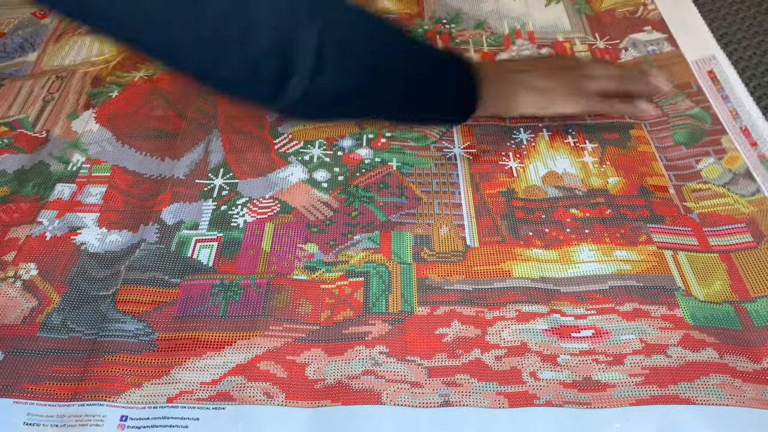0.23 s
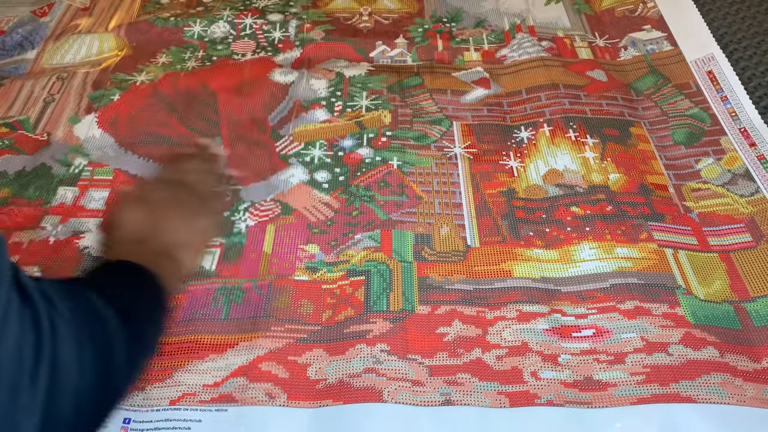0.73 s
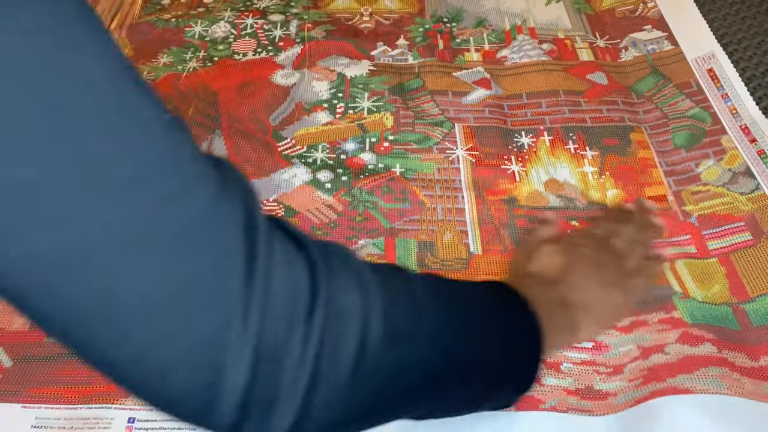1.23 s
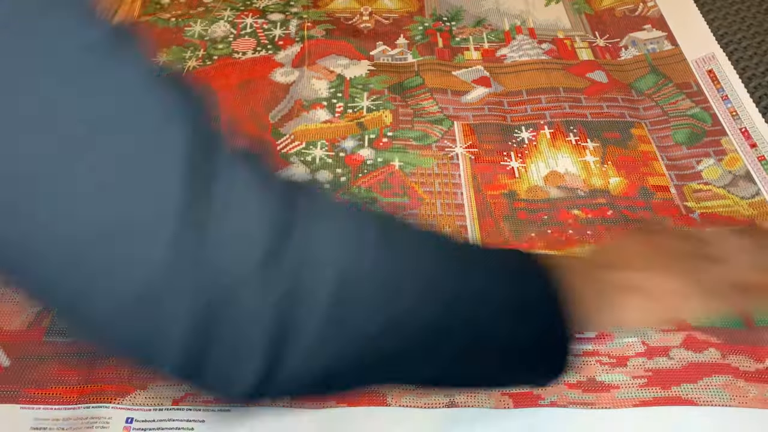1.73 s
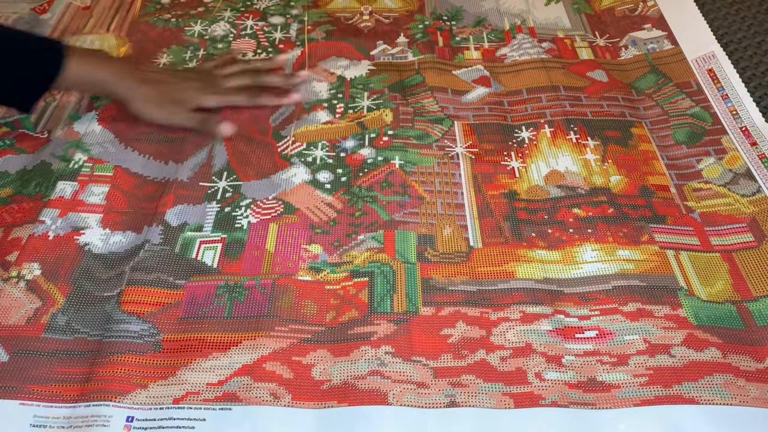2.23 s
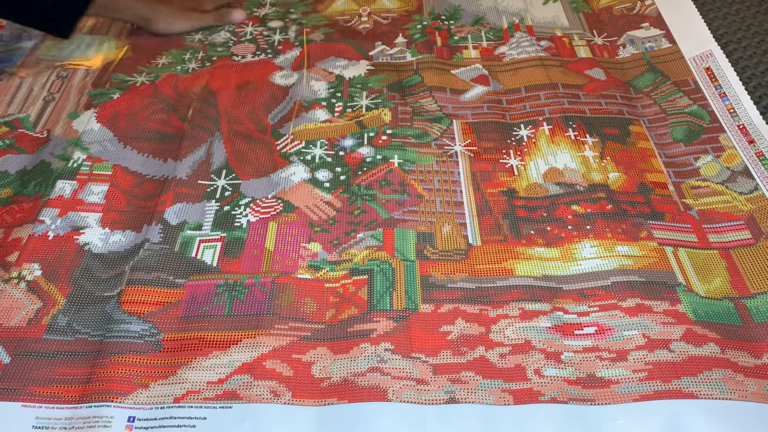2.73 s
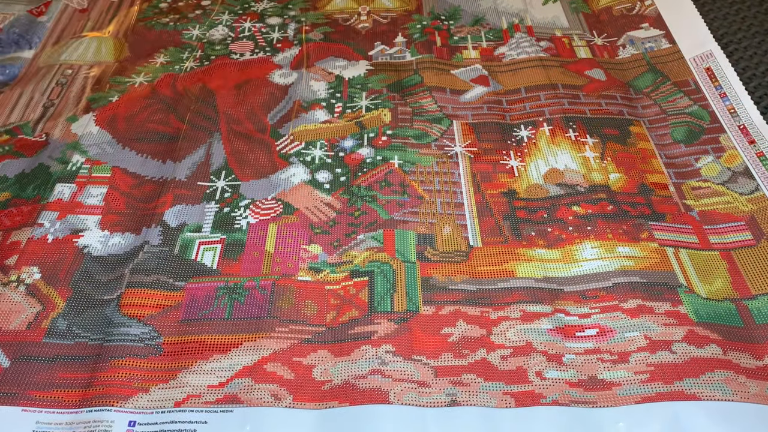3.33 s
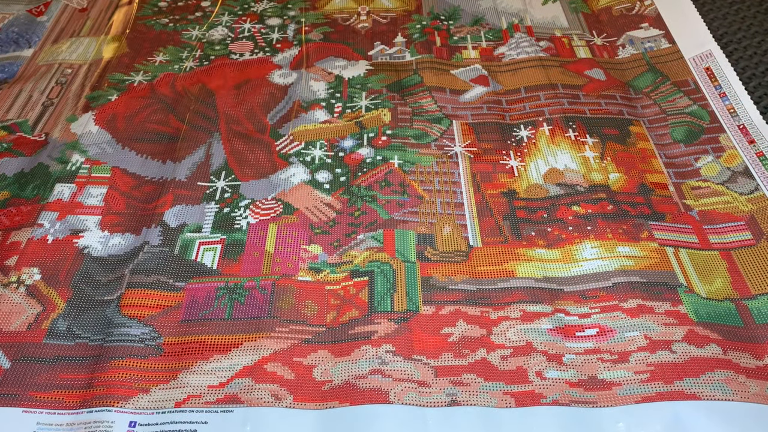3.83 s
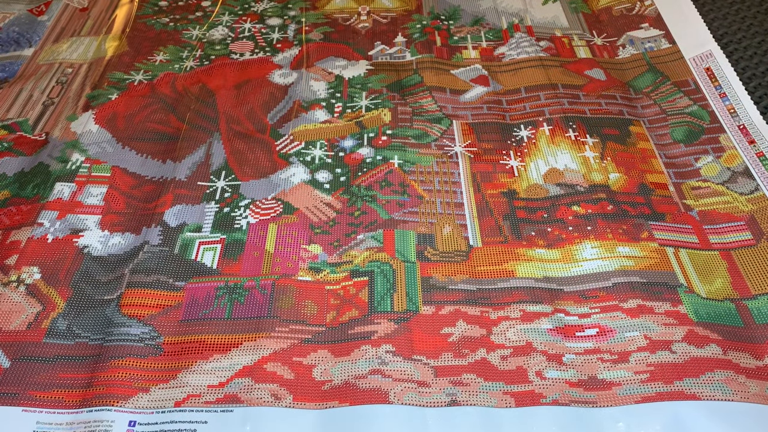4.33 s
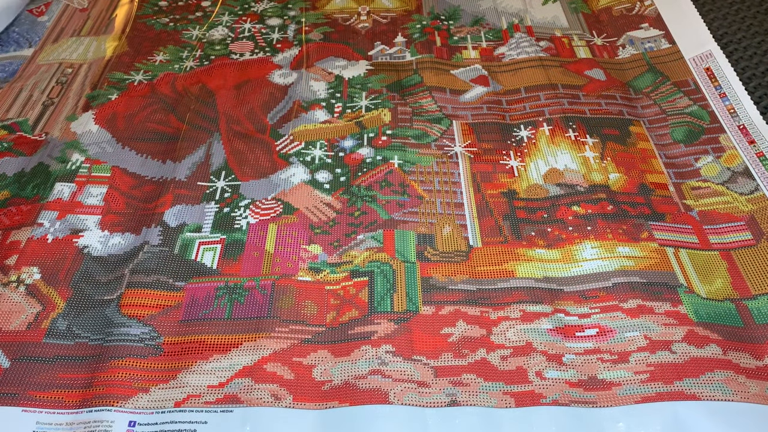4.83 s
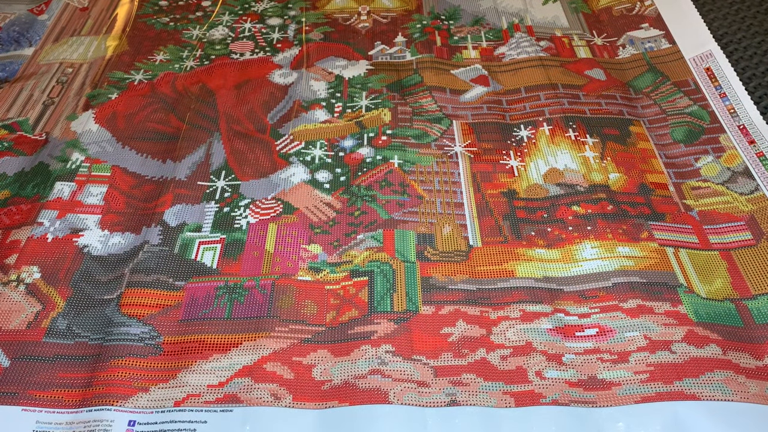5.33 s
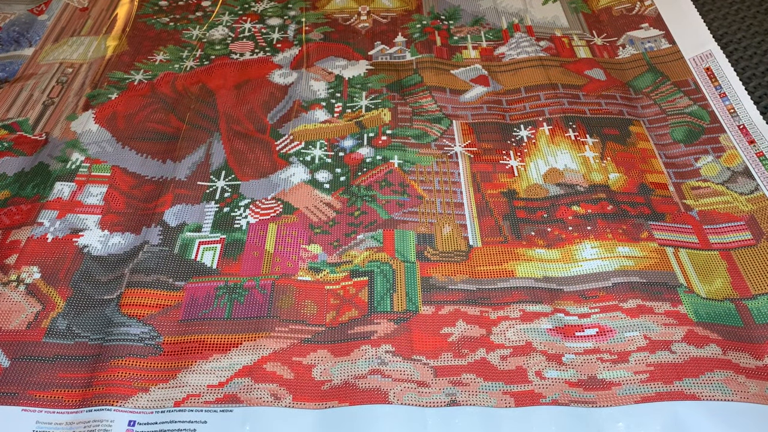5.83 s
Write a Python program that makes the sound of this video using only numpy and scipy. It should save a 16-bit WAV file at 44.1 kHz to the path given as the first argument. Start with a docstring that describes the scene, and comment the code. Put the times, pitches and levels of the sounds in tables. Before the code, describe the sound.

A palm slides over a large plastic-covered canvas on a table, making bright, grainy swishes and sharp little crinkles. The strokes come in two spells with a brief lull between them, and a few soft finger taps knock the table. The rubbing then dies down to faint rustles, scattered ticks and light taps. It is heard close by in stereo, in a quiet room with a low rumble and motor hum.

```python
"""Smoothing film over a canvas

A hand smooths a large canvas under plastic film on a table in a quiet room. Palm, film and canvas
hiss with tiny slips as they slide; the film buckles in sharp snaps, and finger taps ring the table top.
Air rumbles and a motor hums at twice the mains rate. Two microphone ports 10 cm apart pick it up."""
import sys
import numpy as np
from scipy import signal
from scipy.fft import rfft, irfft, next_fast_len
from scipy.io import wavfile

SR = 44100
rng = np.random.default_rng(int(sys.argv[2]) if len(sys.argv) > 2 else 0)


def put_to_file(sound):
    """Save the sound as 16-bit audio at rate SR, in the file named by the first command-line argument."""
    columns = np.atleast_2d(sound).T  # one column per channel
    safe = np.clip(columns, -1, 1)
    whole_steps = np.round(safe * 32767)
    wavfile.write(sys.argv[1], SR, whole_steps.astype(np.int16))


N = 268613
TIME_S = np.arange(N) / SR
FFT_SIZE = next_fast_len(N)
BINS_HZ = np.arange(FFT_SIZE // 2 + 1) * SR / FFT_SIZE + 1
PORT_LAG_S = 0.0003   # the sheet lies nearer the left port


def from_db(db):
    return 10 ** (np.asarray(db) / 20)


def unit_rms(x):
    return x / np.sqrt(np.mean(x ** 2) + 1e-20)


def on_bins(points, column=1):
    points = np.array(points)
    return np.interp(np.log(BINS_HZ), np.log(points[:, 0]), points[:, column])


def filtered(x, response):
    return irfft(rfft(x, FFT_SIZE) * response, FFT_SIZE)[..., :N]


def colour(x, spectrum):
    """Spectral shaping at unit power gain for white noise."""
    return filtered(x, unit_rms(from_db(on_bins(spectrum))))


def delayed(x, lag_s):
    return filtered(x, np.exp(-2j * np.pi * BINS_HZ * lag_s))


def drift(corner_hz):
    """Slow noise at unit rms: two-pole low-pass, run at SR / 20."""
    pole = np.exp(-40 * np.pi * corner_hz / SR)
    slow = signal.lfilter([1], [1, -2 * pole, pole * pole], rng.standard_normal(N // 20 + 4002))[4000:]
    return np.interp(np.arange(N) / 20, np.arange(len(slow)), unit_rms(slow))


def impulses(times_s, sizes):
    train = np.full(N, 1e-18)
    np.add.at(train, (np.asarray(times_s) * SR).astype(int), sizes)
    return train


def ring(x, hz, t60_s):
    """Damped mode: a unit impulse starts a unit sine."""
    r, w = from_db(-60 / (t60_s * SR)), 2 * np.pi * hz / SR
    return signal.lfilter([0, np.sin(w)], [1, -2 * r * np.cos(w), r * r], x)


def swells(times_s, levels_db, rise_s, fall_s):
    """Power envelope of events that rise 60 dB in rise_s and fall 60 dB in fall_s."""
    rise, fall = from_db(-120 / (np.array([rise_s, fall_s]) * SR))
    train = impulses(times_s, from_db(2 * levels_db))
    before = signal.lfilter([0, rise], [1, -rise], train[::-1])[::-1]
    return before + signal.lfilter([1], [1, -fall], train)


def friction(level_db, spectrum, slips_per_s, spread_db, grain_db, alike,
             patchy_db=2.2, boost_db=lambda hz: 0, bands=10):
    """Sliding hiss and clumped slips in drifting bands; the wide contact is partly alike at the ports."""
    slipping = rng.random(N) < slips_per_s * from_db(5 * drift(15)) / SR
    sizes = from_db(spread_db * np.minimum(rng.exponential(1, N), 3))
    slips = unit_rms(slipping * sizes * rng.choice([-1, 1], N))
    slip_band = rng.uniform(0, bands - 1, N)
    common = np.sqrt(alike) * rng.standard_normal(N)
    separate = np.sqrt(1 - alike) * rng.standard_normal((2, N))
    log_centres = np.linspace(np.log(spectrum[0][0]), np.log(spectrum[-1][0]), bands)
    port_delays = np.exp(-2j * np.pi * BINS_HZ * [[0], [PORT_LAG_S]])
    shape = unit_rms(from_db(on_bins(spectrum))) / np.sqrt(1 + from_db(2 * grain_db))
    out = 0
    for k, triangle in enumerate(np.eye(bands)):
        band = shape * np.interp(np.log(BINS_HZ), log_centres, triangle)
        grain = from_db(grain_db) * np.sqrt(2) * (abs(slip_band - k) < bands / 3) * slips
        rubbing = filtered(separate, band) + filtered(common + grain, band * port_delays)
        out += from_db(patchy_db * drift(13.5) + boost_db(np.exp(log_centres[k]))) * rubbing
    return from_db(level_db) * out


# Steady stroke: t/s, film level/dB, palm level/dB
HAND_STROKE = [(0.0, -34, -49.5), (0.15, -44.5, -50), (0.3, -55, -64), (0.52, -69, -69), (0.6, -65, -52.5),
               (0.9, -39, -48.5), (1.42, -41, -49), (1.52, -42, -50.5), (1.618, -41, -42.5),
               (1.69, -85, -64), (1.9, -46.5, -55.5), (2.04, -65, -64.5), (2.13, -90, -51.5),
               (2.15, -35.5, -44), (2.45, -42.5, -54), (3.05, -38, -44.5), (3.15, -44, -51),
               (3.449, -42.5, -47), (3.95, -50, -56), (4.1, -60, -55), (4.35, -91, -69.5), (4.6, -58, -55),
               (4.85, -67, -75.5), (5.1, -60, -56), (5.3, -71, -54), (5.45, -87, -87.5), (6.09, -94.5, -74)]
# Forward jerks: t/s, film level/dB, palm level/dB, canvas level/dB
HAND_JERKS = [(0.679, -34, -40, -54), (0.804, -36, -46.5, -43.5), (0.935, -31, -34.5, -39.5),
              (1.065, -36, -39.5, -42.5), (1.179, -47, -42, -40.5), (1.318, -28.5, -49, -42),
              (1.472, -51, -43, -50), (2.17, -53, -65, -63), (2.294, -33.5, -41.5, -45.5),
              (3.05, -42, -50, -70), (3.272, -38, -43.5, -77)]

def hand_motion():
    """Film, palm and canvas levels in dB: stroke, jerks, settling after snaps, shifting after taps."""
    stroke_s, *stroke_db = np.transpose(HAND_STROKE)
    film_db, palm_db = (np.interp(TIME_S, stroke_s, db) for db in stroke_db)
    canvas_db = palm_db - 8
    steady = from_db(2 * np.array([film_db, palm_db, canvas_db]))
    jerk_s, *jerk_db = np.transpose(HAND_JERKS)
    jerks = [swells(jerk_s, db, rise_s=0.14, fall_s=0.28) for db in jerk_db]
    snap_s, snap_db = np.transpose(FILM_SNAPS)
    settle_db = -30 + 0.5 * (snap_db + 30)   # loud snaps leave less than their share
    bright, dull = (swells(snap_s, settle_db + db, rise_s=0.0081, fall_s=0.16) for db in (-20, -31))
    tap_s, tap_db, nail_db, _ = np.transpose(FINGER_TAPS)
    shift = swells(tap_s, tap_db + nail_db - 20, rise_s=0.0061, fall_s=0.3)
    return 10 * np.log10(steady + jerks + [bright, dull, shift])


# Film rustle spectrum: f/Hz, relative density/dB
FILM_SPECTRUM = [(3000, -24), (5500, -16), (8000, 0), (9800, -1), (16000, 2)]

def film_rustle(level_db):
    """Sliding plastic: dense, even slips, bright and grainy."""
    return friction(level_db, FILM_SPECTRUM, slips_per_s=2100, spread_db=0, grain_db=2, alike=0.7,
                    patchy_db=2)


# Buckles: t/s, relative level/dB
FILM_SNAPS = [(0.0644, -24), (0.2412, -27), (0.247, -24), (0.314, -38), (0.5413, -30), (0.5592, -33),
              (0.613, -26), (0.6744, -22), (0.7883, -22), (0.9056, -20), (0.9371, -21), (0.9982, -20),
              (1.0328, -21), (1.0581, -7), (1.1925, -15), (1.2122, -20), (1.2383, -20), (1.2848, -12),
              (1.2906, -18), (1.3225, -21), (1.3321, -19), (1.3521, -16), (1.4616, -21), (1.4684, -19),
              (1.4777, -18), (1.7055, -37), (1.751, -23), (1.8132, -38), (1.8551, -31), (1.8665, -24),
              (1.9132, -26), (1.9242, -33), (1.965, -34), (2.0879, -39), (2.1437, -22), (2.1666, -21),
              (2.1715, -16), (2.2298, -21), (2.2412, -21), (2.2873, -18), (2.3511, -23), (2.4669, -24),
              (2.5605, -24), (2.5735, -20), (2.7387, -24), (2.7875, -21), (2.8721, -16), (2.9204, -23),
              (3.0292, -18), (3.0352, -20), (3.0383, -19), (3.0482, -18), (3.1714, -25), (3.2557, -22),
              (3.3476, -25), (3.3972, -24), (3.4193, -14), (3.4505, -19), (3.468, -25), (3.5419, -24),
              (3.599, -28), (3.6151, -26), (3.6265, -9), (3.7293, -22), (3.737, -28), (3.7564, -29),
              (3.7939, -27), (3.8064, -25), (3.8829, -20), (3.9113, -16), (3.9399, -28), (3.9474, -27),
              (3.9743, -25), (4.0573, -30), (4.0607, -32), (4.0658, -26), (4.1742, -37), (4.1804, -23),
              (4.2635, -45), (4.4136, -35), (4.4595, -39), (4.4724, -40), (4.5546, -30), (4.5644, -33),
              (4.6776, -43), (4.7499, -34), (4.8558, -46), (4.8789, -26), (4.9609, -43), (5.0171, -30),
              (5.0953, -39), (5.1508, -33), (5.2527, -31), (5.3713, -34), (5.4827, -49), (5.9103, -48)]
# Bright part of a snap: f/Hz, relative density/dB
SNAP_BRIGHT_SPECTRUM = [(2500, -16), (5000, -6), (10000, 0), (16500, -4)]
# Dull part of a snap: f/Hz, relative density/dB
SNAP_DULL_SPECTRUM = [(1900, -5.5), (3000, -9), (9000, -9)]

def film_snaps(rise_s=0.0004, t60_s=0.0036, dull_spread_db=4):
    """Each buckle of the film is a sharp noise burst with a bright and a duller part."""
    bright, dull = np.zeros((2, N))
    t = np.arange(int(0.012 * SR)) / SR
    burst = np.minimum(t / rise_s, 1) ** 2 * from_db(-60 * np.maximum(t - rise_s, 0) / t60_s)
    for start_s, level_db in FILM_SNAPS:
        noise = rng.standard_normal((2, len(t)))
        span = int(start_s * SR) + np.arange(len(t))
        crisp = np.diff(burst * np.sign(noise[0]), prepend=0)
        bright[span] += from_db(level_db + 4) * crisp / abs(crisp).max()
        dull_db = level_db - 15 + dull_spread_db * noise[1, 0]
        dull[span] += from_db(dull_db) * burst * np.sign(noise[1])
    return colour(bright, SNAP_BRIGHT_SPECTRUM) + colour(dull, SNAP_DULL_SPECTRUM)


# Palm rub spectrum: f/Hz, relative density/dB
PALM_SPECTRUM = [(1500, -8.5), (3000, -12), (4500, -9), (6500, -8.5), (9000, -7)]
# Rasp centre: t/s, pitch/octaves above 1 kHz
PALM_RASP = [(0.6, 2.3), (0.93, 1.8), (1.18, 1.0), (1.37, 2.5), (1.62, 2.45), (2.15, 1.7), (2.8, 2.4),
             (3.05, 1.9)]

def palm_rub(level_db, rasp_db=7, rasp_width_oct=0.6):
    """Skin sliding on film: hiss with a moving rasp peak."""
    centre_oct = np.interp(TIME_S, *np.transpose(PALM_RASP))

    def rasp(hz):
        return rasp_db * np.exp(-((np.log2(hz / 1000) - centre_oct) / rasp_width_oct) ** 2)

    return friction(level_db, PALM_SPECTRUM, slips_per_s=880, spread_db=1.5, grain_db=-5, alike=0.067,
                    boost_db=rasp)


# Canvas spectrum: f/Hz, relative density/dB
CANVAS_SPECTRUM = [(250, -5.5), (600, -8), (1200, -5), (2200, -5.5), (4000, -23.5)]

def canvas_slide(level_db):
    """Canvas shifting under the hand: a dull hiss with little grain."""
    return friction(level_db, CANVAS_SPECTRUM, slips_per_s=520, spread_db=-1.5, grain_db=-7, alike=0.094)


# Taps: t/s, relative level/dB, nail hardness/dB, f/Hz favoured by the spot struck
FINGER_TAPS = [(0.671, -34, -13, 980), (1.056, -29.5, -9, 229), (1.089, -29.5, -41, 1010),
               (1.269, -35.5, -2.5, 239), (1.312, -39.5, 2, 1260), (2.983, -30.5, -14, 513),
               (3.385, -35, -10.5, 960), (4.06, -49, -1.5, 1000), (4.335, -41, 3.5, 1950),
               (4.709, -53, 4, 1110), (5.029, -30.5, 0, 307), (5.106, -43.5, -4, 1200),
               (5.149, -41.5, -5, 196), (5.255, -33.5, -3.5, 243), (5.911, -35.5, -3, 930)]
# Table top modes: f/Hz, level/dB, t60/s
TABLE_MODES = [(143, 3.5, 0.047), (281, 3.5, 0.025), (466, -0.5, 0.025), (800, -3, 0.035),
               (1030, -3, 0.045), (1430, -5, 0.02), (2157, -9, 0.015), (3540, -8, 0.005), (7150, -5, 0.001)]

def finger_taps(nail_above_hz=600, spot_db=8.5, spot_width_oct=0.58, lag_s=0.001575):
    """The soft fingertip drives the table's low modes, the nail its high ones."""
    tap_s, tap_db, nail_db, spot_hz = np.transpose(FINGER_TAPS)
    scatter_db = rng.normal(0, 2, (len(tap_s), len(TABLE_MODES)))
    out = np.zeros(N)
    for k, (hz, mode_db, t60_s) in enumerate(TABLE_MODES):
        blow_db = tap_db + (nail_db - 1.5 if hz > nail_above_hz else -3)
        favour_db = spot_db * np.exp(-(np.log2(hz / spot_hz) / spot_width_oct) ** 2)
        blows = impulses(tap_s + lag_s, from_db(blow_db + mode_db + favour_db + scatter_db[:, k]))
        out += (-1) ** k * ring(blows, hz, t60_s)
    low_cut = signal.butter(2, 110, "high", fs=SR, output="sos")   # the taps carry no deep bass
    return signal.sosfilt(low_cut, out)


# Tap echo in a small room, weak in the bass: f/Hz, relative gain/dB
TAP_ECHO_SPECTRUM = [(150, -34), (500, -0.5), (1500, 5), (16000, -1.5)]

def room_echo(snaps, taps, t60_s=0.12, first_echo_s=0.002):
    """Dense decaying reflections, different at each port, the first from the table."""
    send = from_db(-20) * snaps + from_db(-3) * colour(taps, TAP_ECHO_SPECTRUM)
    t = np.arange(int(0.5 * SR)) / SR
    tail = rng.standard_normal((2, len(t))) * from_db(-60 * t / t60_s) * (t > first_echo_s)
    tail /= np.linalg.norm(tail, axis=1, keepdims=True)
    return signal.fftconvolve(send[None], tail, axes=1)[:, :N]


# Room air: f/Hz, relative density/dB, left-right coherence/0..1
AIR_SPECTRUM = [(20.2, -32, 0.49), (34.8, -7, 1), (58, 5.5, 1), (95, 4.5, 0.76), (150, 2, 0.88),
                (273, -1.5, 0.8), (628, -12.5, 0.23), (1164, -18, 0.37), (2500, -35.5, 0.12),
                (4900, -53.5, 0.075), (9980, -43.5, 0.36), (16000, -66.5, 0.5)]

def room_air():
    """Rumbling air, alike at both ports in the bass."""
    mid, side = rng.standard_normal((2, N))
    alike = on_bins(AIR_SPECTRUM, column=2)
    mid = filtered(mid, np.sqrt((1 + alike) / 2))
    side = filtered(side, np.sqrt((1 - alike) / 2))
    pair = np.array([mid + side, delayed(mid - side, PORT_LAG_S)])
    return from_db(-48.5) * colour(pair, AIR_SPECTRUM)


# Hum harmonics 1 and 2: level/dB, waver/dB
HUM_HARMONICS = [(-46.5, 0.9), (-54, 2.2)]

def motor_hum(hz=120, wander_rad=0.23):
    """Mains-driven motor, wavering in phase and level."""
    phase = 2 * np.pi * hz * TIME_S + wander_rad * drift(4.5)
    return sum(np.sqrt(2) * from_db(level_db + waver_db * drift(6.6)) * np.sin(k * phase)
               for k, (level_db, waver_db) in enumerate(HUM_HARMONICS, start=1))


def scene():
    """All sources at the left and right ports."""
    film_db, palm_db, canvas_db = hand_motion()
    judder = drift(72)   # stick-slip: film and skin flicker together
    film = film_rustle(film_db + 0.28 * judder)
    palm = palm_rub(palm_db + 2.28 * judder)
    canvas = canvas_slide(canvas_db)
    snaps, taps = film_snaps(), finger_taps()
    direct = np.array([snaps + taps, delayed(snaps + taps, PORT_LAG_S)])
    echo = room_echo(snaps, taps)
    background = (room_air() + motor_hum()) * from_db([[-1.1], [0.9]])
    return film + palm + canvas + direct + echo + background


def record(dry, split_hz=7600, roll_off_hz=16100, cutoff_hz=17150):
    """Left treble comes two port lags late, so the lead changes sides; the very top is cut."""
    treble = 1 / (1 + (split_hz / BINS_HZ) ** 30)
    left = filtered(dry[0], 1 - treble) + filtered(delayed(dry[0], 2 * PORT_LAG_S), treble)
    out = signal.sosfilt(signal.cheby2(8, 22, roll_off_hz, fs=SR, output="sos"), [left, dry[1]])
    return signal.sosfilt(signal.cheby2(12, 70, cutoff_hz, fs=SR, output="sos"), out)


dry = scene()
out = record(dry)
put_to_file(out)
```